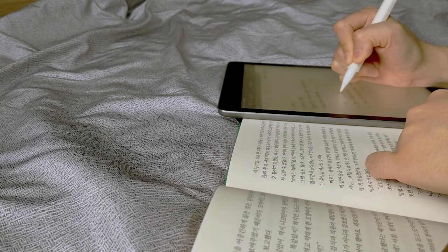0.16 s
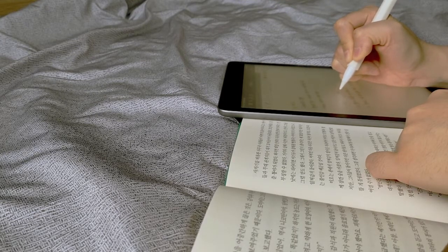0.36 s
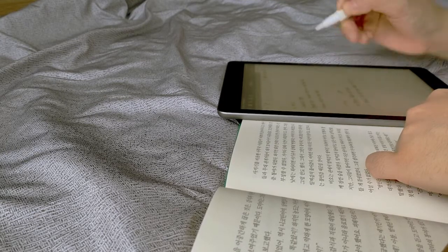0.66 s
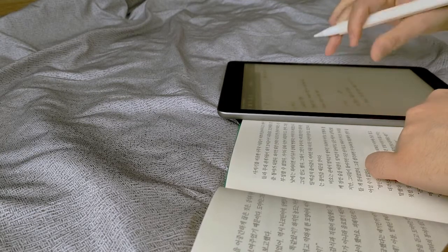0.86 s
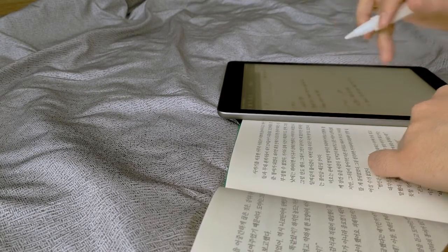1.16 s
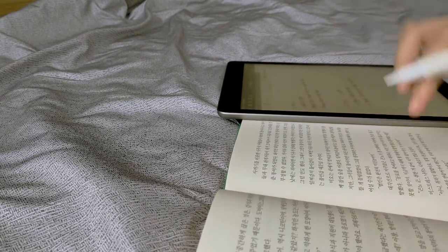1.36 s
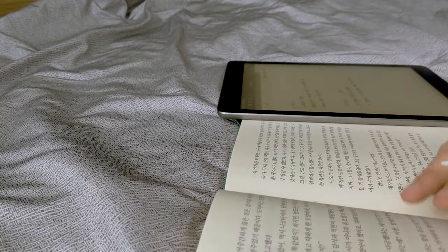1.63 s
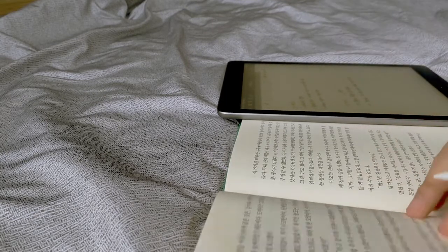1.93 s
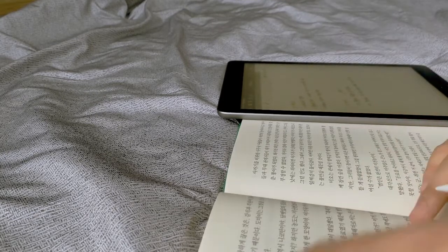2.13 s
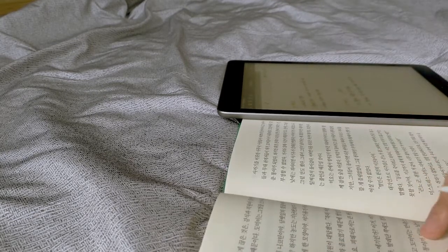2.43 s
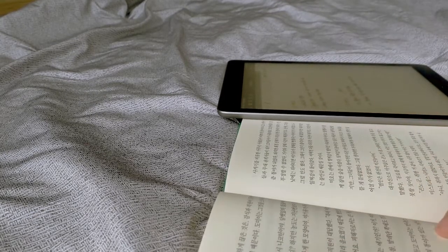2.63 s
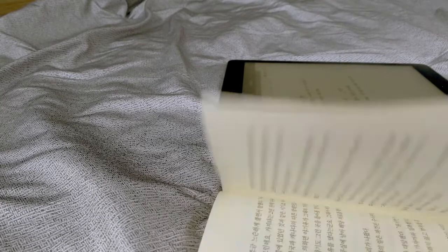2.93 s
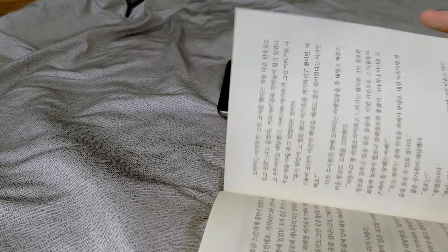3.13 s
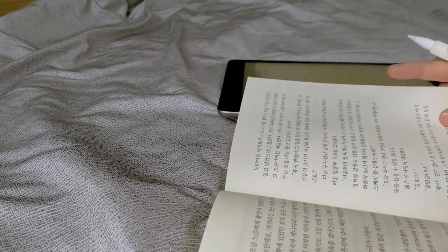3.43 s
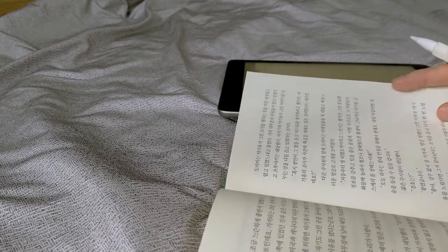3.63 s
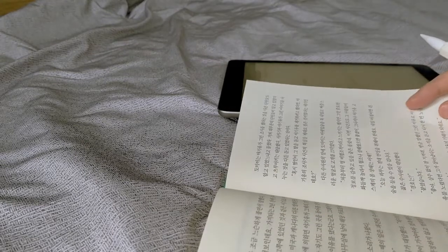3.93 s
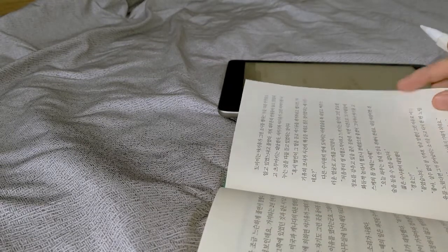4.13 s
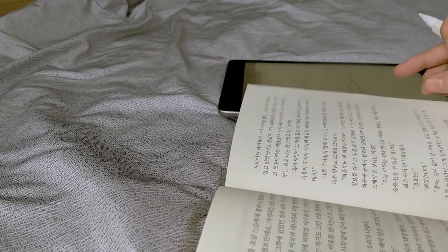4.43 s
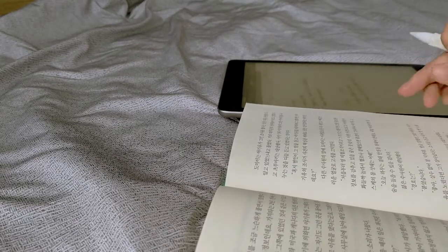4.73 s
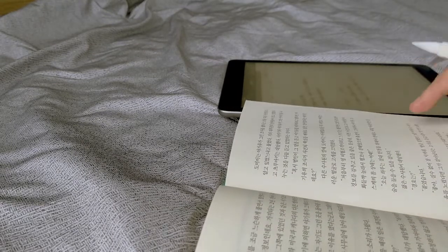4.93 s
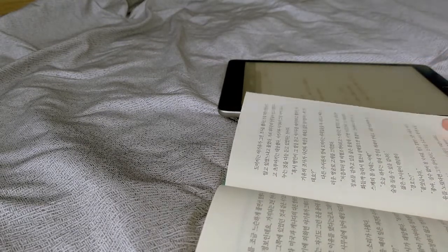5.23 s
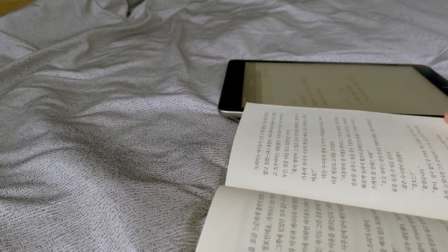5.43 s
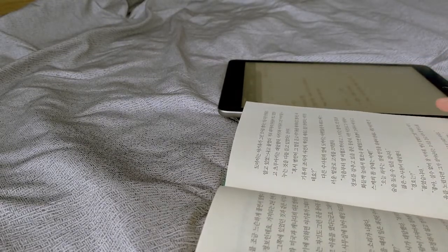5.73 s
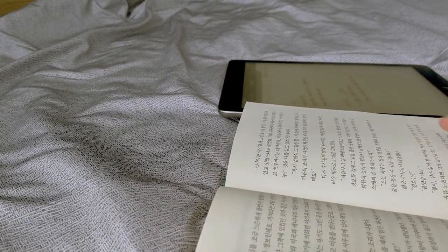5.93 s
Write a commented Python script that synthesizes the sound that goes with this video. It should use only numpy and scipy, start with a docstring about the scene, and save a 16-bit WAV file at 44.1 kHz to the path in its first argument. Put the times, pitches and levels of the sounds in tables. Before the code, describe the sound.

Three soft stylus taps on a tablet, then a hand brushes paper and a book page turns with crisp snaps in a quiet room.

```python
"""Stylus taps and a page turn on a bed

A stylus taps three times on a tablet that lies on a bed: struck modes over a soft swing of the mattress.
A hand brushes the bedding and turns a page: filtered slip noise for rubbing, damped pulses for snaps.
Behind it a quiet small room: shaped noise, a low drone and one faint brief tone, heard by a close microphone.
The recorder's noise suppression turns the low end down for a while.
"""
import sys
import numpy as np
from scipy import signal
from scipy.fft import rfft, irfft, next_fast_len
from scipy.io import wavfile
from scipy.ndimage import uniform_filter1d, map_coordinates

SR = 44100
rng = np.random.default_rng(int(sys.argv[2]) if len(sys.argv) > 2 else 0)


def inscribe(sig):
    """Save sig as 16-bit PCM at rate SR to the path in sys.argv[1].

    A 1-D sig is mono; a 2-D sig holds one channel per row.
    Samples are clipped to [-1, 1] before scaling.
    """
    pcm = np.round(np.clip(np.atleast_2d(sig).T, -1, 1) * 32767)
    wavfile.write(sys.argv[1], SR, pcm.astype(np.int16))


N = 268128
T = np.arange(SR // 2) / SR  # seconds since a contact


# stylus contacts: [start_s, tick_db, knock_db, bounce_db]
TAPS = [(0.236, -27.5, -27, -25.5), (0.4933, -30, -27.5, -27), (0.8262, -37, -32, -41)]
# modes of tip on screen: [freq_hz, relative_db, t60_s]
TIP_MODES = [(1494, -16.5, 0.085), (1770, -3.5, 0.011), (2500, -8, 0.012), (3100, 7, 0.0051),
             (3720, -10, 0.01)]
# modes of tablet body: [freq_hz, relative_db, t60_s]
TABLET_MODES = [(204, 0, 0.0062), (310, 6.5, 0.011), (700, -6.5, 0.025), (1020, -30, 0.028)]


def stylus(knock_lag_s=0.0023, bounce_hz=47, bounce_lag_s=0.0573, bounce_width_s=0.021):
    """The soft tip ticks, the tablet knocks just after, and the mattress swings under it."""
    out = np.zeros(N)
    since_peak = T - bounce_lag_s
    swing = np.exp(-(since_peak / bounce_width_s) ** 2) * np.cos(2 * np.pi * bounce_hz * since_peak)
    tip_onset = 1 - np.exp(-T / 0.00032)
    tablet_onset = 1 - np.exp(-T / 0.00017)
    for start_s, tick_db, knock_db, bounce_db in TAPS:
        add(out, start_s, amp(tick_db) * ring(TIP_MODES) * tip_onset)
        add(out, start_s + knock_lag_s, amp(knock_db) * ring(TABLET_MODES) * tablet_onset)
        add(out, start_s, amp(bounce_db) * swing)
    return out


# page buckles: [start_s, level_db, pitch_hz, rise_s, crack_db, flap_db]; crack and flap relative to level
SNAPS = [(2.456, -35, 1730, .00048, -7, -4), (2.6855, -28.5, 2400, .00018, 2, -2),
         (2.8071, -26, 2300, .00025, -3, -14), (2.8182, -26.5, 2070, 0.00029, 2, -12),
         (2.933, -28.5, 3820, 0.00023, 0, -2), (3.2244, -19.5, 3730, 0.0001, 1.5, 1),
         (3.56, -10, 3150, 0.00043, -22, -19), (3.5615, -5.5, 4150, 0.00037, -12, -36),
         (3.5621, -21, 1390, 0.0016, -16, -25), (3.7106, -3, 2200, 0.00022, -14, -6),
         (3.8082, -14, 2700, 0.00027, -26, -17), (4.0889, -25, 1760, 0.00031, -21, -5.5)]
# crack spectrum: [freq_hz, relative_db_per_hz]
CRACK_SPECTRUM = [(500, 8), (2000, 2), (7000, -4.5), (8500, -9), (13000, -11), (16000, -20)]
# a harder snap flaps the sheet higher: pitch at the reference level, level rise per octave
FLAP_HZ, FLAP_AT_DB, FLAP_DB_PER_OCTAVE = 453, -21.5, 25


def snaps(flap_rise_s=0.00043):
    """Paper buckles: a damped pulse, a bright crack and a lower flap of the whole sheet."""
    out = np.zeros(N)
    for start_s, level_db, pitch_hz, rise_s, crack_db, flap_db in SNAPS:
        noise = coloured(rng.standard_normal(len(T)), CRACK_SPECTRUM)
        crack = 0.5 * noise * stroke(0.00029, 0.0024)
        flap_hz = FLAP_HZ * 2 ** ((level_db - FLAP_AT_DB) / FLAP_DB_PER_OCTAVE)
        flap = pulse(flap_hz, flap_rise_s)
        snap = pulse(pitch_hz, rise_s) + amp(crack_db) * crack - amp(flap_db) * flap
        add(out, start_s, amp(level_db) * snap)
    return out


# bending sheet creaks and rasps: [start_s, level_db, pitch_hz, rise_s, fall_s]
CREAKS = [(2.555, -39, 1930, 0.029, 0.015), (2.716, -35, 2870, 0.0025, 0.024),
          (3.499, -33, 3330, 0.047, 0.013), (3.5615, -21.5, 3450, 0.00091, 0.0033),
          (3.617, -34.5, 3100, 0.019, 0.061), (3.712, -32.5, 2380, .001, 0.066),
          (3.747, -22, 1660, 0.0064, 0.0086), (3.755, -29, 3350, 0.0053, 0.012),
          (3.807, -19.5, 2000, 0.0023, 0.0074), (3.836, -36, 2100, 0.0026, 0.019),
          (3.906, -36, 1720, 0.013, 0.0068), (4.012, -44, 1050, 0.022, 0.026),
          (4.090, -27.5, 1450, 0.00085, 0.0093), (4.114, -30.5, 1250, 0.0048, 0.011),
          (5.189, -50, 1220, 0.023, .14), (5.974, -38, 2820, 0.04, 0.029)]


def creaks(width_ratio=1.0, top_ratio=2.23):
    """Runs of quick slips ring one broad resonance of the bent sheet, which passes little far above it."""
    out = np.zeros(N)
    for start_s, level_db, pitch_hz, rise_s, fall_s in CREAKS:
        def bend(hz):
            rolloff = 1 + (hz / (top_ratio * pitch_hz)) ** 6
            return resonance(hz, pitch_hz, pitch_hz * width_ratio) ** 2 / rolloff

        rasp = unit(filtered(slips(len(T), rate_hz=2500, smooth=0.67), bend))
        add(out, start_s, amp(level_db) * stroke(rise_s, fall_s) * rasp)
    return out


# skin and cloth catch on paper: [start_s, hiss_db, hiss_tilt_db_per_octave, body_db, rise_s, fall_s]
SCUFFS = [(2.715, -41, 2, -33.5, 0.0027, 0.039), (2.748, -42, 1, -32.5, 0.024, 0.0092),
          (2.9328, -38.5, 0.5, -41, 0.0033, 0.057), (3.135, -44.5, -2.5, -41.5, 0.052, 0.037),
          (3.49, -37.5, 0.5, -48, 0.037, 0.025), (3.575, -61, -2, -19, 0.0018, 0.0036),
          (3.714, -35, -13, -32, 0.0019, 0.12), (3.756, -30, -1.5, -38, 0.0071, 0.025),
          (3.872, -37.5, -3, -48, 0.0093, 0.023), (4.025, -66, -7, -41.5, 0.0032, 0.029),
          (4.092, -59, -4, -33, 0.0015, 0.024), (4.441, -39, 2.5, -39, 0.0024, 0.14),
          (4.483, -30, -2, -30, 0.0016, 0.04), (4.535, -34, -6.5, -39.5, 0.006, 0.039),
          (4.645, -37.5, -0.5, -44.5, 0.034, 0.027), (4.83, -35.5, 2, -49.5, 0.08, 0.038),
          (5.008, -40.5, -7.5, -41, 0.0022, 0.019), (5.613, -37.5, 9.5, -35.5, 0.0072, 0.025),
          (5.635, -45, 9, -41, 0.035, 0.038), (5.965, -39, -1, -44, 0.03, 0.071)]
# hiss spectrum: [freq_hz, relative_db_per_hz]
CLOTH_SPECTRUM = [(200, -8.5), (1000, 4), (4000, 4), (5500, 0), (9000, -2), (13000, -2.5), (16000, -7)]
# dull sheet spectrum: [freq_hz, relative_db_per_hz]
SHEET_SPECTRUM = [(40, 7.5), (110, 4.5), (250, 2.5), (450, -2), (1000, -11), (2000, -14), (5000, -23),
                  (14000, -37)]


def scuffs():
    """Short catches: a grainy hiss over the dull flutter of the sheet."""
    out = np.zeros(N)
    for start_s, hiss_db, tilt_db, body_db, rise_s, fall_s in SCUFFS:
        tilted = [(hz, db + tilt_db * np.log2(hz)) for hz, db in CLOTH_SPECTRUM]
        hiss = coloured(slips(len(T), rate_hz=5700, smooth=1.15), tilted)
        body = coloured(slips(len(T), rate_hz=880, smooth=0.98), SHEET_SPECTRUM)
        add(out, start_s, stroke(rise_s, fall_s) * (amp(hiss_db) * hiss + amp(body_db) * body))
    return out


# hand over paper and bedding: [start_s, length_s, drive_db]
SWEEPS = [(1.124, 0.46, -62.5), (1.84, 0.5, -53.5), (2.28, 0.6, -56), (2.923, .3, -50.5),
          (3.27, 0.35, -56.5), (3.517, 0.32, -48), (3.953, 0.39, -60.5), (5.066, 0.3, -55),
          (5.67, 0.37, -55)]
# fingers drag the page flat: [time_s, drive_db]
DRAG = [(4.22, -68), (4.35, -49.5), (4.47, -47), (4.61, -44.5), (4.8, -43.5), (4.93, -40), (5.14, -45),
        (5.24, -63)]
# resonances of the rubbed page: [freq_hz, width_hz, relative_db]
PAGE_RESONANCES = [(1170, 2800, -5), (1916, 720, -1.5), (3080, 760, 2), (4300, 780, -9), (6560, 5700, -11)]
REST_S, REST_DB = 1.715, -61.5  # from here on the hand lies on the book, never quite still
SWEEP_PAGE_DB = -5.5  # page drive from the hand drive
DRAG_PAGE_DB, DRAG_HISS_DB = 3.5, -7  # page and hiss drive from the drag drive
HISS_GAIN_DB = 6.0  # hiss level above its drive
# flexing level at the reference hiss drive, dB gained per dB of hiss drive
FLEX_DB, FLEX_AT_DB, FLEX_GROWS = -51, -52.5, 0.32
SUPPRESSION_FLEX_DB = -6.5  # gain on the flexing under noise suppression


def rubbing():
    """The page slides and flexes while the hand brushes over paper and bedding."""
    t = np.arange(N) / SR
    resting = amp(REST_DB) * sweep(t - REST_S, N / SR)
    sweep_power = sum((amp(db) * sweep(t - start_s, length_s)) ** 2 for start_s, length_s, db in SWEEPS)
    hand = np.sqrt(resting ** 2 + sweep_power)
    drag = amp(curves(DRAG)[0])
    sliding = np.hypot(amp(SWEEP_PAGE_DB) * hand, amp(DRAG_PAGE_DB) * drag)
    brushing = np.hypot(hand, amp(DRAG_HISS_DB) * drag)
    flexing = amp(FLEX_DB) * (brushing / amp(FLEX_AT_DB)) ** FLEX_GROWS
    flexing *= amp(SUPPRESSION_FLEX_DB * suppression())
    grip_db = wobble(45)  # the grip tightens and loosens

    page = np.zeros(N)
    for freq_hz, width_hz, level_db in PAGE_RESONANCES:
        grains = slips(N, rate_hz=4000, smooth=1.5)
        band = unit(filtered(grains, lambda hz: resonance(hz, freq_hz, width_hz) ** 2))
        # each resonance swells on its own as the contact moves
        page += amp(level_db + 1.9 * wobble(20)) * band

    slide = sliding * amp(0.48 * grip_db) * unit(page)
    hiss = coloured(slips(N, rate_hz=5600, smooth=1.05), CLOTH_SPECTRUM)
    cloth = brushing * amp(0.6 * grip_db + HISS_GAIN_DB) * hiss
    flutter = coloured(slips(N, rate_hz=400, smooth=0.64), SHEET_SPECTRUM)
    flex = flexing * amp(1.3 * wobble(25)) * flutter
    return slide + cloth + flex


SWEEP_ATTACK_S, SWEEP_RELEASE_S = 0.24, 0.08


def sweep(t, length_s):
    """A hand gathers speed, keeps it, then comes to rest."""
    speeding = np.sin(np.pi / 2 * np.clip(t / SWEEP_ATTACK_S, 0, 1)) ** 2
    return speeding * np.exp(-np.maximum(t - length_s, 0) / SWEEP_RELEASE_S)


# pushes of air and mattress: [start_s, level_db, pitch_hz, rise_s]
THUMPS = [(2.691, -28, 52.3, 0.027), (2.728, -28.5, 81, 0.026), (2.735, -29.5, 135, 0.0062),
          (2.748, -21.5, 41.6, 0.041), (2.932, -25.5, 41.3, 0.02), (3.16, -32, 43.7, 0.022),
          (3.578, -20.5, 53.3, 0.01), (3.7136, -15, 87, 0.003), (3.781, -30, 43.3, 0.038),
          (4.482, -31.5, 56, 0.031), (5.647, -36, 170, 0.0027), (5.673, -29.5, 181, 0.0029)]


def thumps():
    """The book rocks on the mattress and the page pushes air: damped low pulses."""
    out = np.zeros(N)
    for start_s, level_db, pitch_hz, rise_s in THUMPS:
        add(out, start_s, amp(level_db) * pulse(pitch_hz, rise_s))
    return out


# room noise spectrum: [freq_hz, relative_db_per_hz]
AIR_SPECTRUM = [(65, -27), (110, -4), (201, -6), (384, -11.5), (571, -13.5), (688, -16), (748, -15),
                (1720, -18.5), (3570, -21.5), (16000, -35)]
# drone spectrum: [freq_hz, relative_db_per_hz]
DRONE_SPECTRUM = [(15, -37), (32, -9), (44, 6.5), (54, 6), (66, -1), (92, -5.5), (125, -33), (250, -68)]
DRONE_DB, DRONE_SAG_DB_PER_S = -40, 0.59  # level at the start, steady weakening
SUPPRESSION_DRONE_DB = -7  # gain on the drone under noise suppression


def background(tone_hz=570, tone_db=-60):
    """Steady room noise, a low noisy drone that slowly weakens, and a faint tone that comes and goes once."""
    t = np.arange(N) / SR
    air = amp(-52.5) * coloured(rng.standard_normal(N), AIR_SPECTRUM)
    drone_db = DRONE_DB - DRONE_SAG_DB_PER_S * t + SUPPRESSION_DRONE_DB * suppression()
    drone = amp(drone_db) * coloured(rng.standard_normal(N), DRONE_SPECTRUM)
    gate = np.interp(t, [1.0, 1.04, 1.17, 1.21], [0, 1, 1, 0])
    tone = amp(tone_db) * gate * np.sin(2 * np.pi * tone_hz * t)
    return air + drone + tone


# noise suppression at work, set times: [start_s, end_s]
SUPPRESSION_SPAN = (3.33, 4.42)


def suppression():
    """1 while the recorder's noise suppression turns the low end down, with 0.1 s edges."""
    t = np.arange(N) / SR
    inside = (t > SUPPRESSION_SPAN[0]) & (t < SUPPRESSION_SPAN[1])
    return uniform_filter1d(1.0 * inside, size=SR // 10)


# reverberation: [freq_hz, t60_s]
ROOM_DECAY = [(100, 0.27), (1000, 0.35), (4000, 0.21), (12000, 0.15)]


def room(x, wall_lag_s=0.0087, wall_db=-19, tail_db=-15):
    """One near wall echoes within a short soft tail of noise that decays at its own rate per frequency."""
    hz, t, z = signal.stft(rng.standard_normal(len(T)), SR, nperseg=256)
    decay = amp(-60 * t / along(ROOM_DECAY, hz)[:, None])
    tail = signal.istft(z * decay, SR, nperseg=256)[1]
    answer = amp(tail_db) * tail / np.linalg.norm(tail)
    answer[round(wall_lag_s * SR)] += amp(wall_db)
    return x + signal.fftconvolve(x, answer)[:N]


def stroke(rise_s, fall_s):
    """A contact builds up linearly, then dies away exponentially."""
    return np.minimum(T / rise_s, 1) * np.exp(-np.maximum(T - rise_s, 0) / fall_s)


def pulse(hz, rise_s):
    """A damped swing whose envelope peaks at 1 after its rise time."""
    return T / rise_s * np.exp(1 - T / rise_s) * np.sin(2 * np.pi * hz * T)


def ring(modes):
    """Struck modes decay as sines, each at a slightly new strength."""
    out = np.zeros(len(T))
    for hz, db, t60_s in modes:
        out += amp(db + rng.normal(0, 1) - 60 * T / t60_s) * np.sin(2 * np.pi * hz * T)
    return out


def slips(size, rate_hz, smooth):
    """Tiny random slips of fibres over a smooth share of noise."""
    grains = (rng.random(size) < rate_hz / SR) * rng.standard_normal(size)
    return unit(grains) + smooth * rng.standard_normal(size)


def resonance(f, hz, width_hz):
    """Response of one damped resonance, 1 at its centre."""
    return 1j * f * width_hz / (hz * hz - f * f + 1j * f * width_hz)


def wobble(rate_hz):
    """A smooth random curve through rate_hz knots a second."""
    knots = rng.standard_normal(int(N * rate_hz / SR) + 4)
    return map_coordinates(knots, [np.arange(N) * rate_hz / SR])


def curves(rows):
    """One value per sample for each column after the time; -120 outside the rows."""
    s, *columns = np.transpose(rows)
    return [np.interp(np.arange(N) / SR, s, c, left=-120, right=-120) for c in columns]


def along(points, hz):
    """(Hz, value) points read on a log frequency axis."""
    f, v = np.transpose(points)
    return np.interp(np.log(hz + 1), np.log(f + 1), v)


def filtered(x, response):
    """x times a response of frequency."""
    m = next_fast_len(len(x) + 8192)
    return irfft(rfft(x, m) * response(np.fft.rfftfreq(m, 1 / SR)), m)[:len(x)]


def coloured(x, spectrum):
    """x filtered by a spectrum, at rms 1."""
    return unit(filtered(x, lambda hz: amp(along(spectrum, hz))))


def amp(db):
    """Decibels to gain."""
    return 10 ** (np.asarray(db) / 20)


def unit(x):
    """Scale to rms 1."""
    return x / np.sqrt(np.mean(x ** 2) + 1e-20)


def add(track, start_s, x):
    """Mix x into the track at start_s."""
    part = track[round(start_s * SR):][:len(x)]
    part += x[:len(part)]


def scene():
    """Stylus, page and bed in the quiet room."""
    echoed = room(stylus() + snaps() + creaks() + scuffs())
    return (echoed + thumps() + rubbing() + background())[None]


# microphone response: [freq_hz, gain_db]
MIC_RESPONSE = [(3400, -1.5), (4550, 0.5), (4950, -4.5), (5600, -1), (6700, 1), (7600, -2), (9700, 1),
                (10400, -3.5), (11200, 0.5)]
TOP_HZ = 15900


def record(dry):
    """The microphone ripples the treble and keeps nothing above its band limit."""
    return filtered(dry[0], lambda hz: amp(along(MIC_RESPONSE, hz)) * (hz < TOP_HZ))[None]


dry = scene()
out = record(dry)
inscribe(out)
```